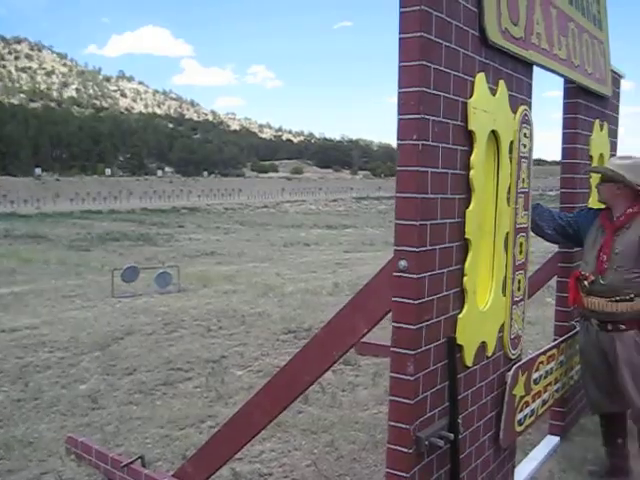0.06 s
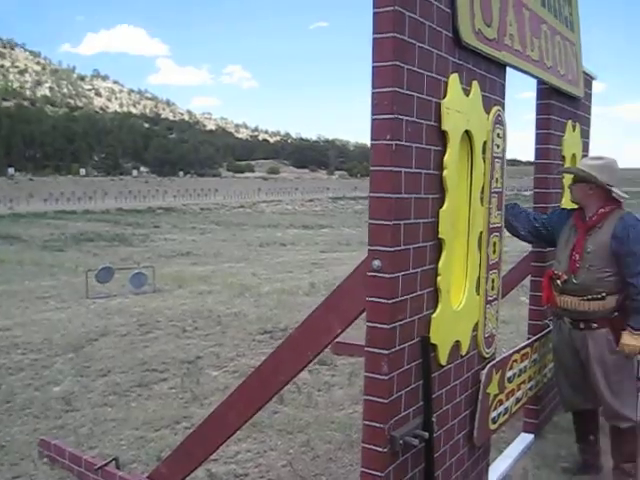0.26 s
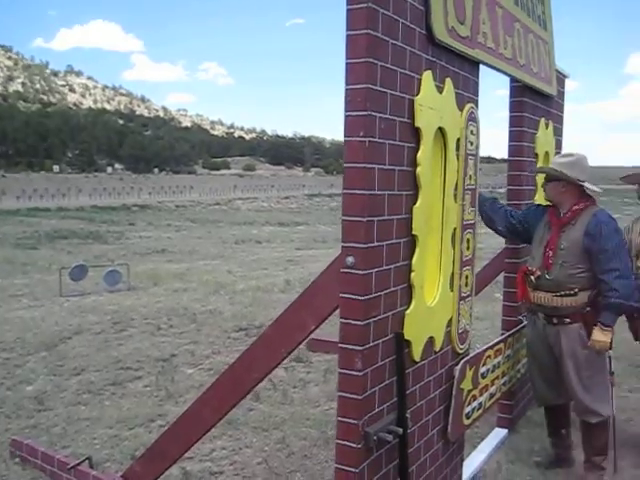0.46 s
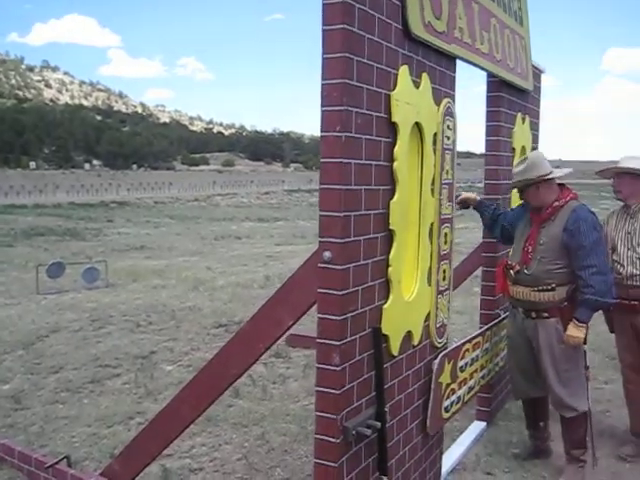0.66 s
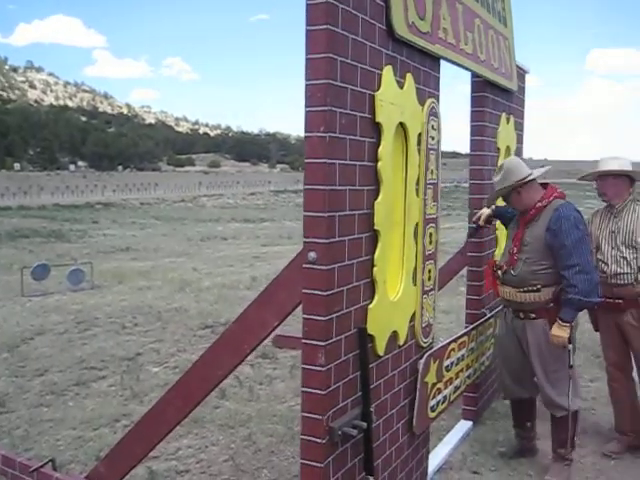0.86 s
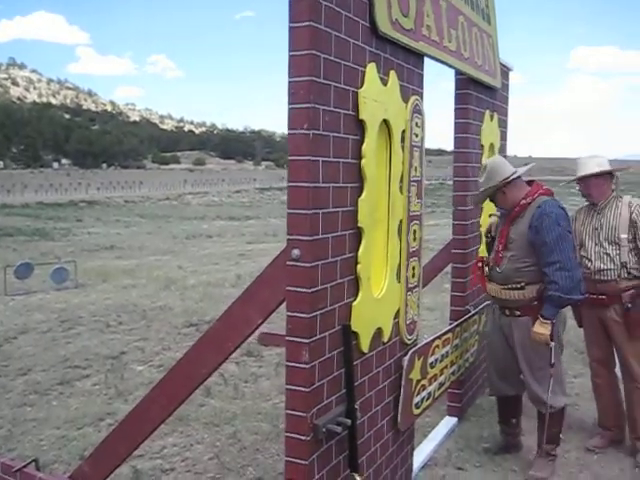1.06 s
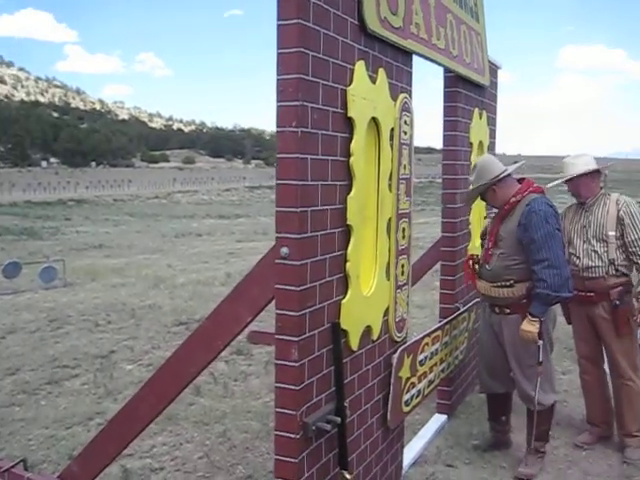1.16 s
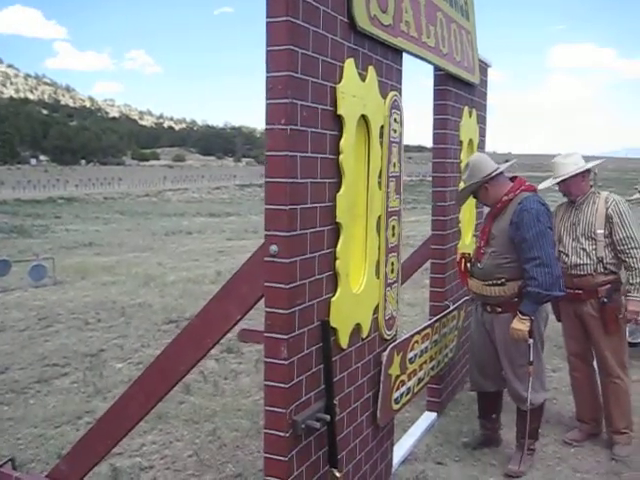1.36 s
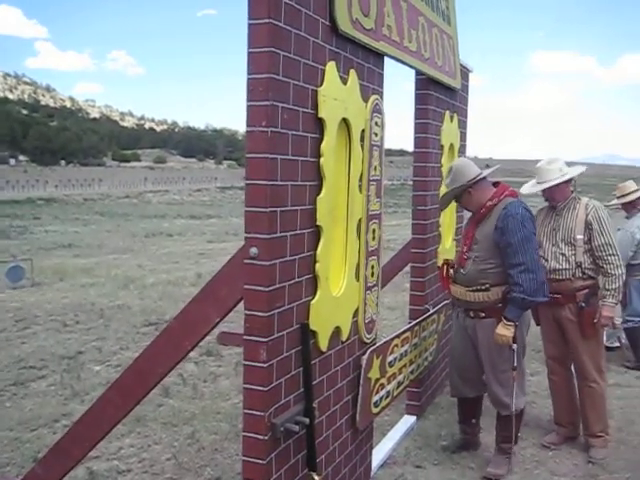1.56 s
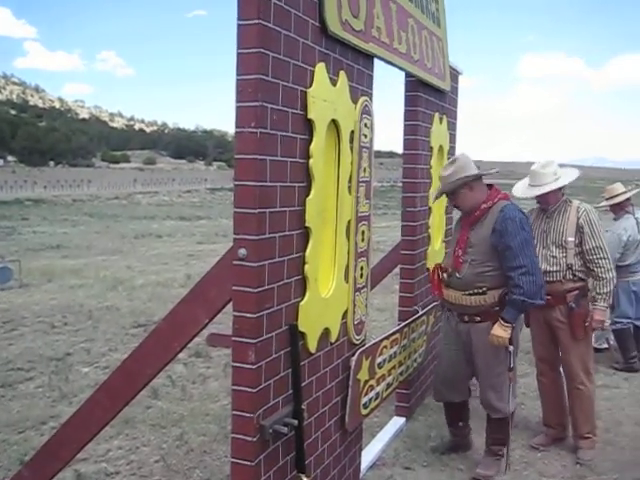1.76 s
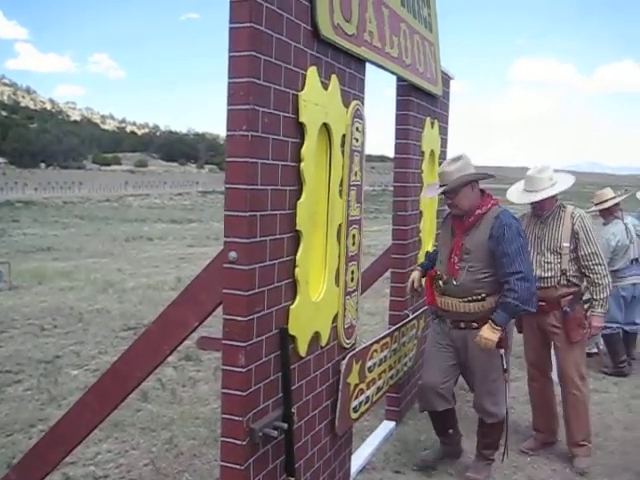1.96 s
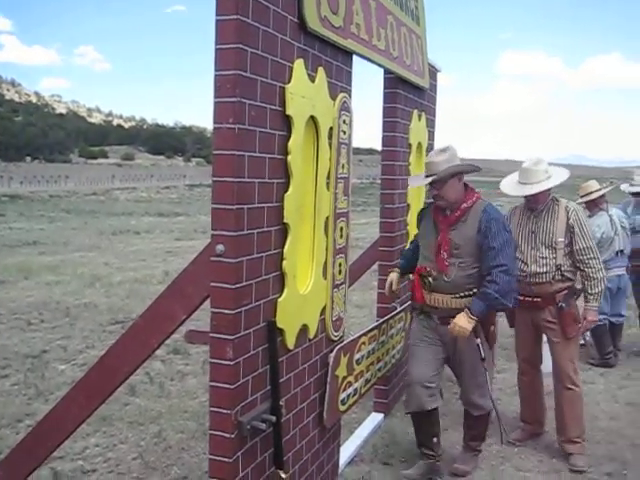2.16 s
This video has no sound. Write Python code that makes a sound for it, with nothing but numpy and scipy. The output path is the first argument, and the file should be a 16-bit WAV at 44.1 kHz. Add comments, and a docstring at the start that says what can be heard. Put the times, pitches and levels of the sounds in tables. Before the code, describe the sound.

Loud close gunshot overloads the microphone, followed by a bright metal target clang and rolling open-range echoes

```python
"""A far crack dies away over faint air noise; a gun click, then one revolver shot from behind a wooden
stage front on an open range overloads the microphone. The bullet rings a steel plate (decaying modes);
the report rolls back from field, tree line and far hills (scattered, coloured impulses) while the gain
control recovers. Later come a step back, sharp cracks from further along the range (noise bursts),
and the shooter's clicks, rustle and last step."""
import sys
import numpy as np
from scipy import signal
from scipy.io import wavfile
from scipy.ndimage import uniform_filter1d, minimum_filter1d

SR = 44100
rng = np.random.default_rng(int(sys.argv[2]) if len(sys.argv) > 2 else 0)


def wav_out(sig):
    """Save sig, one row per channel (or a flat mono array), as 16-bit PCM at SR to the path in sys.argv[1]."""
    wavfile.write(sys.argv[1], SR, np.round(np.clip(np.atleast_2d(sig).T, -1, 1) * 32767).astype(np.int16))


N = 97020
SHOT_S = 0.2130


def amp(db):
    """Decibel law: 20 dB is a factor of ten in amplitude."""
    return 10 ** (np.asarray(db) / 20)


def decay(t, t60):
    """Exponential damping: the level falls by 60 dB in t60 seconds."""
    return np.exp(-np.log(1000) * t / t60)


def unit(x):
    """Power normalisation: scale to an rms of 1."""
    return x / np.sqrt(np.mean(x ** 2) + 1e-20)


def level(points):
    """Envelope: gain over the whole scene, linear in dB between (time_s, level_db) points."""
    times_s, levels_db = np.transpose(points)
    return amp(np.interp(np.arange(N) / SR, times_s, levels_db))


def add(mix, s, sound):
    """Superposition: sum a sound into the mix from s seconds, trimmed to the scene."""
    at = round(s * SR)
    sound = sound[max(-at, 0):]
    part = mix[max(at, 0):][:len(sound)]
    part += sound[:len(part)]


def colour(x, points, tilt_db=0):
    """Minimum-phase filtering: unit-energy response through the points, treble tilted per octave."""
    size, tilt_from_hz = 4096, 400
    octave = np.log2(abs(np.fft.fftfreq(size, 1 / SR)) + 1)
    f, db = np.transpose(points)
    gain_db = np.interp(octave, np.log2(f + 1), db)
    gain_db = gain_db + tilt_db * np.maximum(octave, np.log2(tilt_from_hz))
    # the Hilbert transform of the log gain supplies the minimum phase
    spectrum = np.exp(np.conj(signal.hilbert(np.log(amp(gain_db)))))
    taps = np.fft.ifft(spectrum).real[:size // 2]
    return signal.oaconvolve(x, taps / np.linalg.norm(taps))[:len(x)]


def burst(points, db, t60, tilt_db=0, snap=0):
    """Damped impulsive noise: led by a shock front of height snap, then coloured."""
    t = np.arange(SR // 2) / SR
    puff = rng.choice([-1., 1.], len(t)) * decay(t, t60)
    puff += snap * (t == 0)
    return amp(db) * colour(puff, points, tilt_db)


def scatter(points, per_s, spread_db):
    """Diffuse scattering: countless small arrivals of uneven size, bunched into clumps; rms 1."""
    clump_db, clump_s = 1.08, 0.0046
    window = np.hanning(int(2 * clump_s * SR))
    clumps = unit(signal.oaconvolve(rng.standard_normal(N), window, "same"))
    uneven_db = spread_db * np.minimum(rng.exponential(1, N), 4)
    size = amp(uneven_db + clump_db * np.clip(clumps, -2, 2))
    sign = rng.choice([-1., 1.], N)
    arrives = rng.random(N) < per_s / SR
    return unit(colour(size * sign * arrives, points))


def open_air():
    """Stationary random noise: white noise shaped by a fixed spectrum."""
    # spectrum of the background air: frequency_hz, relative_gain_db
    air_colour = [(20, -28), (45, -16.5), (90, -8), (125, -0.5), (170, -17), (280, -11.5), (420, -14),
                  (650, -5), (1000, -9.5), (1600, -13), (2400, -20), (4000, -24.5), (7000, -28),
                  (11000, -35), (16000, -49.5)]
    return amp(-43.5) * colour(rng.standard_normal(N), air_colour)


def shooter():
    """Contact and friction noise: gun clicks and boot steps as bursts, a rustle as scattered impulses."""
    # faint rustle: time_s, level_db
    rustle_level = [(1.2, -85), (1.47, -47), (1.7, -60.5), (1.83, -50.5), (1.95, -48.5), (2.2, -51.5)]
    # rustle spectrum: frequency_hz, relative_gain_db
    rustle_colour = [(1500, -24), (3000, -1), (4000, 3.5), (5000, -5), (8000, -10), (15000, -16.5)]
    # metal clicks of the gun: start_s, level_db, t60_s, tilt_db_per_octave
    gun_clicks = [(.1986, -32.5, 0.036, -2), (1.291, -34.5, 0.078, 4), (1.857, -23.5, 0.016, -5),
                  (1.870, -35, 0.054, -11)]
    # click spectrum: frequency_hz, relative_gain_db
    click_colour = [(20, -80), (800, -52), (2000, -10), (3500, 8), (5500, -1), (7800, 0.5), (11000, -6),
                    (16000, -22)]
    # boot steps: start_s, level_db, t60_s, tilt_db_per_octave
    boot_steps = [(1.087, -24.5, 0.047, -3), (1.115, -42, 0.13, 2), (2.11, -37, 0.19, 12.5)]
    # step spectrum: frequency_hz, relative_gain_db
    step_colour = [(30, -9), (70, -2), (140, 3.5), (320, 5.5), (500, -1), (1200, -29), (4000, -58),
                   (12000, -94)]
    out = level(rustle_level) * scatter(rustle_colour, per_s=2300, spread_db=3.5)
    for s, db, t60, tilt_db in gun_clicks:
        add(out, s, burst(click_colour, db, t60, tilt_db, snap=2.8))
    for s, db, t60, tilt_db in boot_steps:
        add(out, s, burst(step_colour, db, t60, tilt_db))
    return out


def cracks():
    """Distant impulses: thin reports from further along the range, and their reflections, as bursts."""
    # reports and reflections: start_s, level_db, t60_s, tilt_db_per_octave
    far_reports = [(-.004, -30, 0.19, 7), (1.2347, -11.5, 0.014, -1), (1.238, -12, 0.049, -2.5),
                   (1.263, -28.5, 0.066, -3), (1.322, -27, .04, -10), (1.3359, -29.5, 0.065, -1.5),
                   (1.396, -31, 0.028, -1)]
    # crack spectrum: frequency_hz, relative_gain_db
    crack_colour = [(200, -51), (700, -40), (1200, 4), (1650, -3.5), (2500, 4), (4000, -1.5), (5500, -13),
                    (7500, -25), (11000, -42), (16000, -54)]
    out = np.zeros(N)
    for s, db, t60, tilt_db in far_reports:
        add(out, s, burst(crack_colour, db, t60, tilt_db))
    return out


def echoes():
    """Delayed reflection: diffuse returns from ever further and duller ground, with clear slaps."""
    # diffuse return of the field: time_s, level_db
    field_level = [(.23, -17), (.30, -11.5), (.35, -10.5), (.44, -10), (.52, -16.5), (.60, -25),
                   (.68, -22.5), (.78, -23), (.9, -38.5), (1.05, -61), (1.3, -69)]
    # field spectrum: frequency_hz, relative_gain_db
    field_colour = [(25, -35), (100, -19), (280, -10.5), (450, -13.5), (800, -0.5), (1500, -1), (2600, 3),
                    (3400, -3.5), (4200, -1.5), (5500, -15), (7000, -25.5), (9000, -35), (14000, -55)]
    # diffuse return of the tree line: time_s, level_db
    trees_level = [(.58, -59), (.67, -52), (.76, -26), (.84, -19.5), (.92, -21.5), (1.0, -27.5),
                   (1.1, -32.5), (1.2, -37), (1.35, -37.5), (1.6, -66), (2.2, -57)]
    # tree-line spectrum: frequency_hz, relative_gain_db
    trees_colour = [(25, -38), (120, -29.5), (280, -18), (450, -17), (680, 2), (900, 1), (1400, -6),
                    (2000, -4.5), (2600, -8), (3400, -16), (4300, -22.5), (5500, -38), (8000, -60)]
    # diffuse return of the far hills: time_s, level_db
    hills_level = [(1.0, -70), (1.25, -43), (1.4, -40.5), (1.55, -36.5), (1.7, -36.5), (1.85, -41),
                   (2.0, -42.5), (2.2, -41.5)]
    # hill spectrum: frequency_hz, relative_gain_db
    hills_colour = [(25, -42), (120, -21), (300, -10.5), (450, -5), (620, 2.5), (900, -6.5), (1300, -5),
                    (2000, -17.5), (3000, -26), (5000, -33), (12000, -71)]
    # single clear echoes: start_s, level_db, dullness (0 field colour to 1 tree colour)
    slaps = [(0.2468, 4.5, 1), (0.3385, 0, 0.8), (0.5048, -1, 0), (0.5382, -6, 0), (0.5728, -6.5, 0.01),
             (0.602, -8, 0), (.633, -8, 0), (0.643, -7, 0), (0.6625, -15.5, 0.12), (.665, -6.5, 0),
             (.677, -7, 0.08), (0.679, -11, 0.02), (0.682, -6, 0.02), (0.697, -17, 0.1), (0.7012, -20, 0.2),
             (0.7341, -7, 0.6), (.737, -18, 1), (0.7531, -9, 0.24), (0.768, -15.5, 0), (.787, -17.5, 0),
             (.804, -12.5, 0.4), (.827, -13.5, 1), (.856, -10, 0.86), (.906, -14, 0.98), (1.468, -25, 1),
             (1.554, -20.5, 1.)]

    t = np.arange(N) / SR
    field = level(field_level) * scatter(field_colour, per_s=4000, spread_db=3)
    trees = level(trees_level) * scatter(trees_colour, per_s=4000, spread_db=3)
    hills = level(hills_level) * scatter(hills_colour, per_s=15000, spread_db=1)
    out = field * (t > SHOT_S)
    out += trees * (t > trees_level[0][0])
    out += hills * (t > hills_level[0][0])
    for s, db, dull in slaps:
        dull = np.clip(dull, 0, 1)
        bright_slap = burst(field_colour, db, t60=0.011, snap=1.2)
        dull_slap = burst(trees_colour, db, t60=0.013, tilt_db=-2.5)
        add(out, s, np.sqrt(1 - dull) * bright_slap + np.sqrt(dull) * dull_slap)
    return out


def plate():
    """Modal vibration: the bullet splatters on steel; damped modes ring, close pairs beating."""
    # mode frequencies of the plate: frequency_hz
    modes_hz = [1798, 1803, 2509, 2832, 4057, 4236.3, 4270, 7234, 7260, 8546, 8730, 10709, 10734, 11022,
                14126]
    # ringing of each mode, in the same order: level_db, t60_s, swell_s
    # (some modes only grow as the struck plate swings round)
    ringing = [(-15.5, 1.82, 0.0015), (-2, 0.29, 0.0018), (-10.5, 1.22, 0.094), (-14, 1.1, 0.35),
               (7, 0.12, 0.0015), (1, 1.18, 0.21), (3.5, 0.65, 0.19), (2.5, 0.22, 0.0006),
               (6.5, 0.43, 0.091), (-3.5, 0.53, 0.23), (-17, 0.97, 0.067), (-5, 0.26, .001),
               (6.5, 0.39, 0.21), (-5.5, 0.54, 0.12), (-25, 0.66, .2)]
    # splatter spectrum: frequency_hz, relative_gain_db
    splat_colour = [(180, -58), (300, -38), (1370, -2), (3790, -5.5), (6100, -13), (6730, -16.5),
                    (11000, -25), (15000, -36)]
    hit_s = 0.2665
    out, t = np.zeros(N), np.arange(N) / SR
    add(out, hit_s, burst(splat_colour, db=19, t60=0.0097))
    for hz, (db, t60, swell) in zip(modes_hz, ringing):
        envelope = (1 - np.exp(-t / swell)) * decay(t, t60)
        add(out, hit_s, amp(db) * envelope * np.sin(2 * np.pi * hz * t))
    # one tone that swells briefly in the ringing
    ping_s, ping_width_s, ping_hz = 0.52, 0.025, 1846
    ping_envelope = np.exp(-((t - ping_s) / ping_width_s) ** 2)
    return out + amp(-15.5) * ping_envelope * np.sin(2 * np.pi * ping_hz * t)


def shot():
    """Blast wave: a pressure push, a short low boom, and a noisy spray of near reflections."""
    # muzzle blast spectrum: frequency_hz, relative_gain_db
    shot_colour = [(40, -16), (170, -26.5), (280, -6), (440, -16.5), (900, -3), (1250, 2), (2200, -9),
                   (2650, -4), (4400, -5.5), (6000, -18), (9000, -16), (15000, -35)]
    leak_lead_s, push_s, boom_hz, blast_t60_s = 0.00171, 0.0026, 271, 0.073
    out, t = np.zeros(N), np.arange(SR // 4) / SR
    push = amp(10) * (1 - t / push_s) * np.exp(-t / push_s)
    boom = amp(10) * np.sin(2 * np.pi * boom_hz * t) * decay(t, t60=0.032)
    # sound through the boards arrives just ahead
    add(out, SHOT_S - leak_lead_s, burst(shot_colour, -17.5, blast_t60_s))
    add(out, SHOT_S, boom - push)
    add(out, SHOT_S, burst(shot_colour, 10, blast_t60_s))
    add(out, SHOT_S, burst(shot_colour, 0, t60=0.24, tilt_db=-2.0))  # longer, duller tail
    return out


def scene():
    """Linear superposition of all the sources at the microphone."""
    return (open_air() + shooter() + cracks() + echoes() + plate() + shot())[None]


def record(dry):
    """Dynamic compression: gain dives too late for the blast, holds, recovers; clipping, band limit."""
    limit_db, duck_max_db, ceiling = -4, 25.5, 0.74
    attack_s, hold_s, release_s = 0.0098, 0.062, 0.12
    hiss_db, edge_hz = -60, 16200
    x, t = dry[0], np.arange(N) / SR
    power_db = 10 * np.log10(abs(uniform_filter1d(x ** 2, size=128)) + 1e-12)
    over_db = np.clip(4 * (power_db - limit_db), 1e-6, duck_max_db)
    # hold the largest reduction of the last hold_s
    hold = int(hold_s * SR) // 2 * 2 + 1
    held = -minimum_filter1d(-over_db, hold, origin=hold // 2)
    # the reduction in dB then decays exponentially
    release = t / release_s
    released = np.exp(np.maximum.accumulate(np.log(held) + release) - release)
    # a one-pole lag makes the attack late
    r = np.exp(-1 / (attack_s * SR))
    duck_db = signal.lfilter([1 - r], [1, -r], released)
    y = np.clip(x * amp(-duck_db), -ceiling, ceiling)
    y = y + amp(hiss_db) * rng.standard_normal(N)  # preamplifier hiss
    lowpass = signal.firwin(511, edge_hz, window=("kaiser", 9), fs=SR)
    return signal.oaconvolve(y, lowpass, "same")[None]


dry = scene()
out = record(dry)
wav_out(out)
```